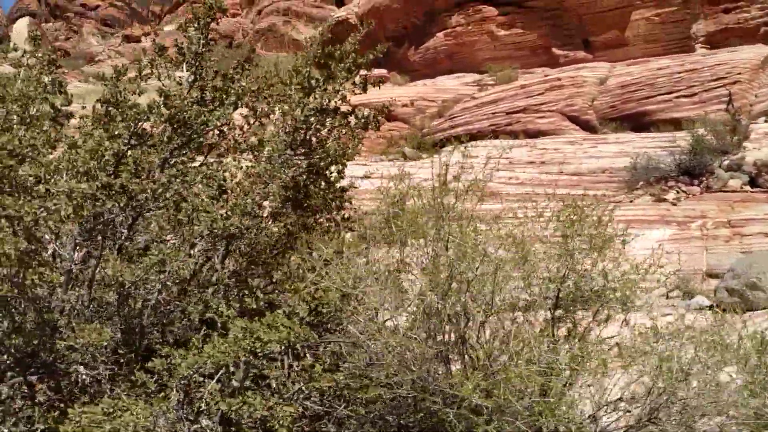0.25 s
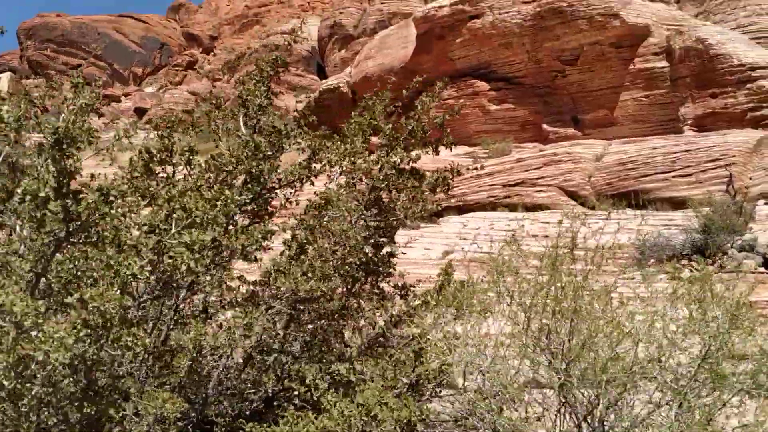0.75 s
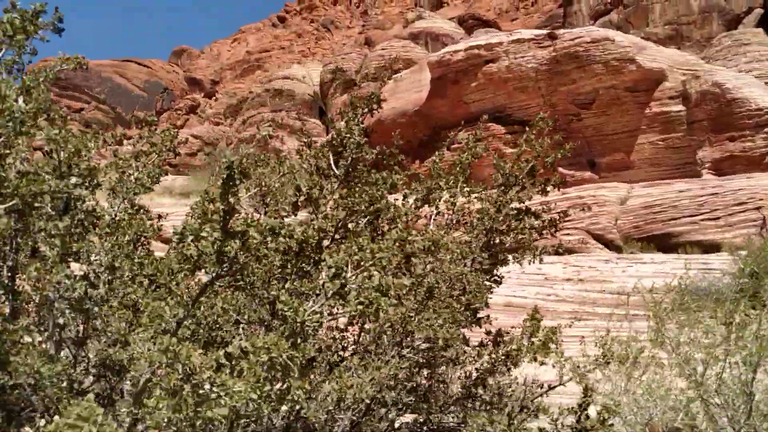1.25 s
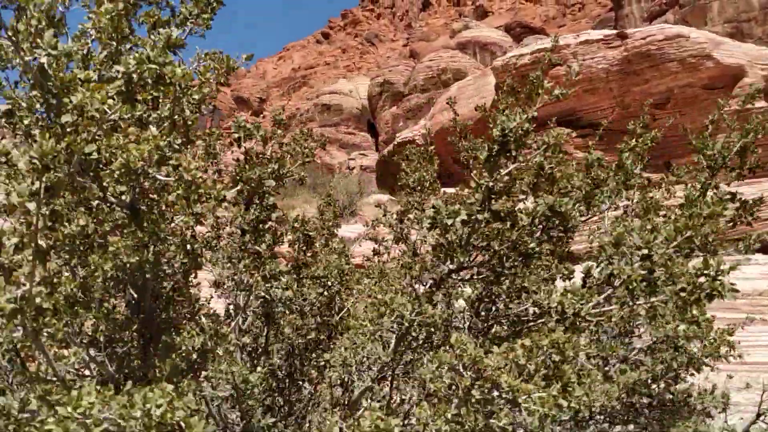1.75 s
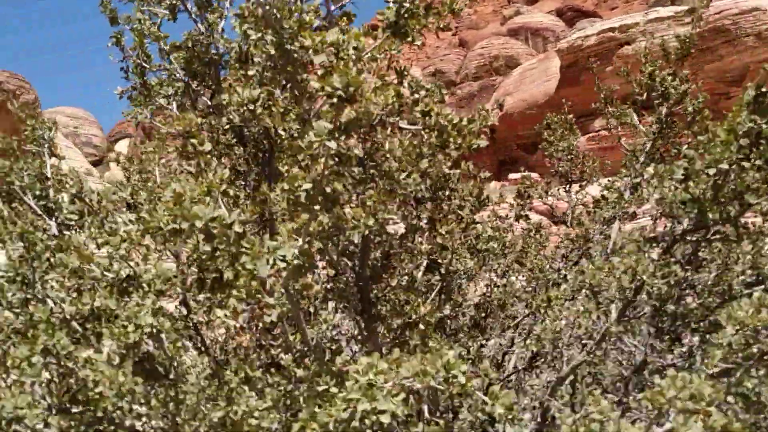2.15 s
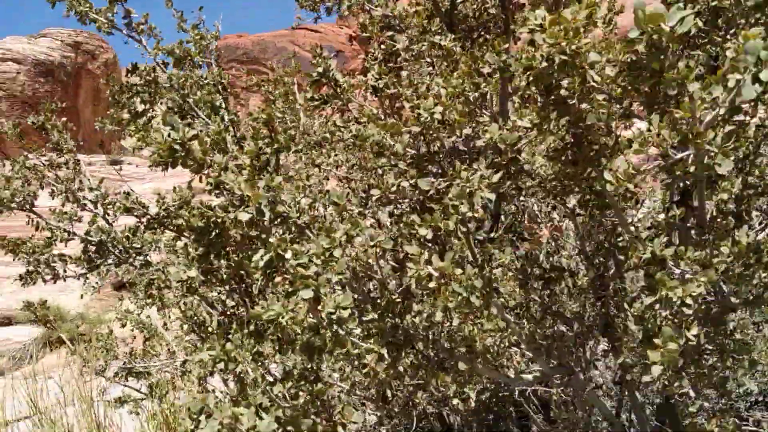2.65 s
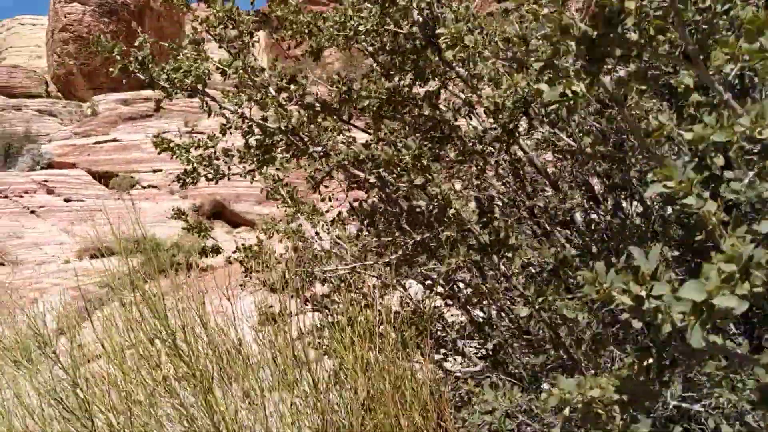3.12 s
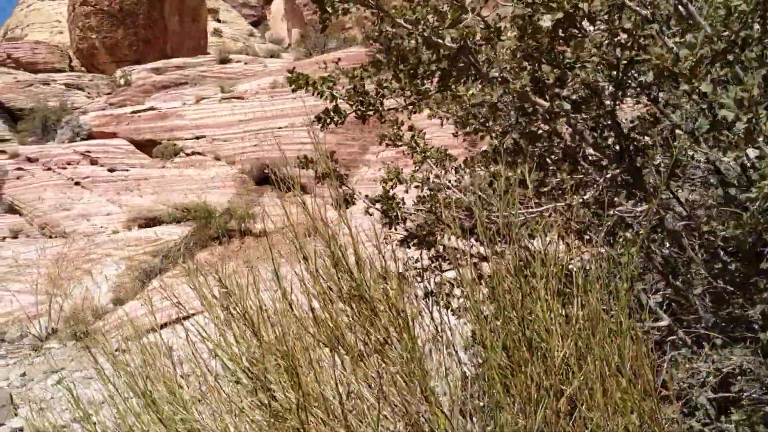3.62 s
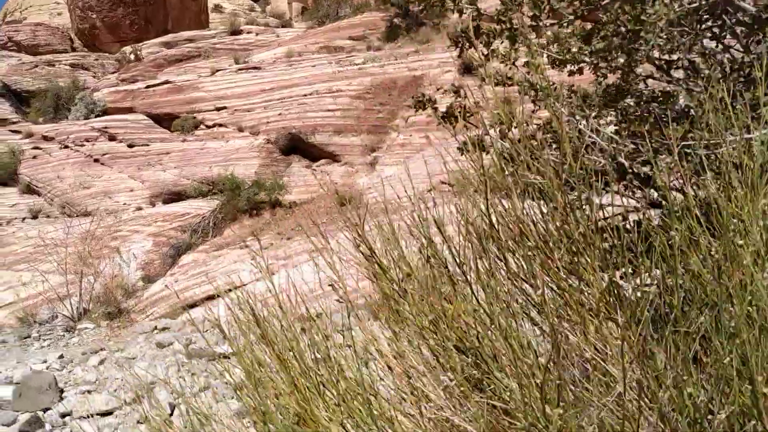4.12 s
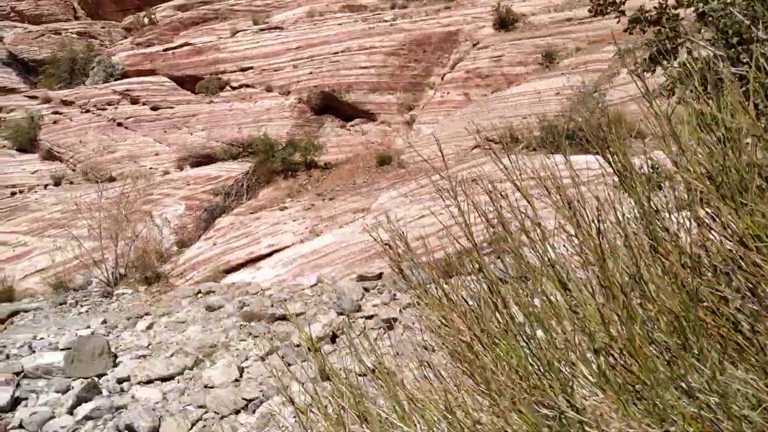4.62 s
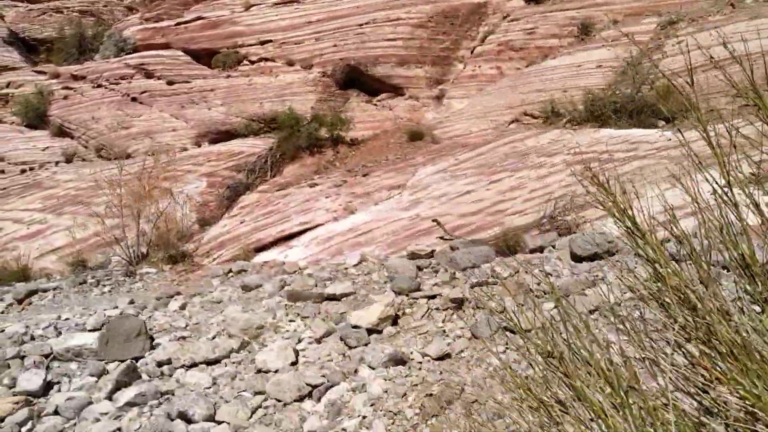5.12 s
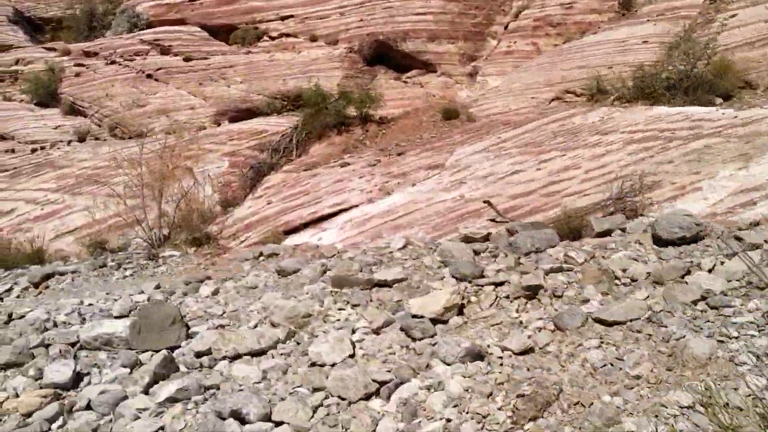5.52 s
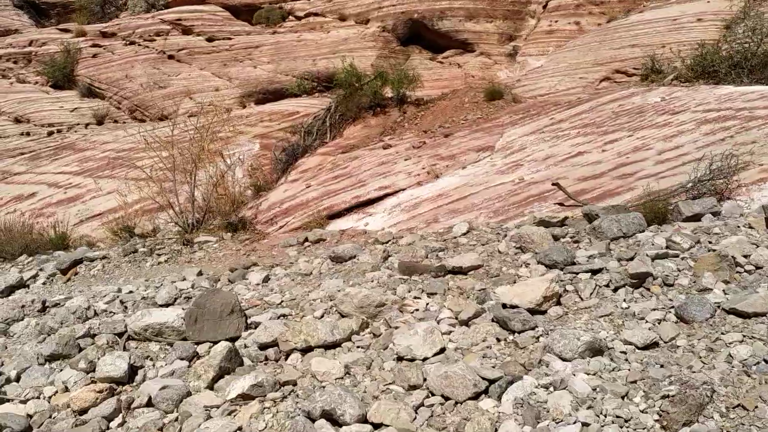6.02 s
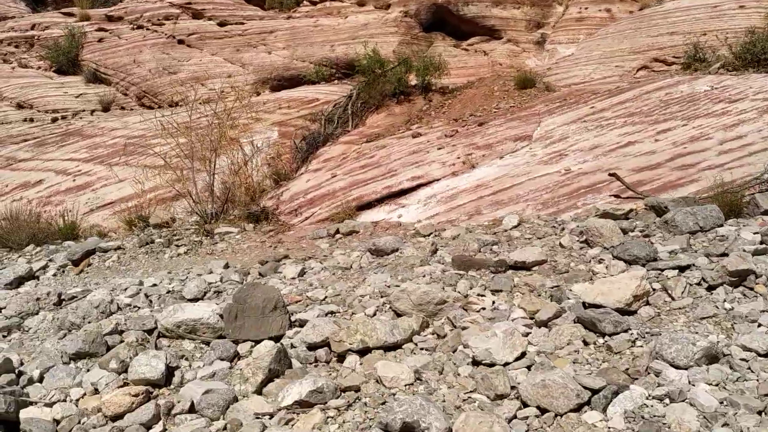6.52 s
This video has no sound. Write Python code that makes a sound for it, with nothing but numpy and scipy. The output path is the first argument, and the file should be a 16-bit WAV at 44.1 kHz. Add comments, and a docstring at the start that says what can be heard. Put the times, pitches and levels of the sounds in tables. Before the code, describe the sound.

Clothes and dry leaves brush softly from 0 to 0.25 s, then a bright, gritty gravel step lands at 0.3 s with snapping pebbles and a dull thud. Lighter treads follow around 0.9 and 1.5 s, the latter with a sharp stone crack. At 1.7 s a small hollow object knocks, a short woody pop with fainter bounces until 1.86. Steps crunch again at 2.1 and 2.6 s; leaves rustle near 3 s before a long grinding step with a heavy thud at 3.3. Scuffs lead to a step at 4.0, cloth swishes at 4.4, a press at 4.6, another swish at 5.0. A strong crunch comes at 5.2, pebbles scatter at 5.4-5.8 around another firm step, leaves stir at 6.0-6.4, and a last thudding step lands at 6.5. Faint open-air hush, close and dry, no echo.

```python
"""Clothes and dry leaves rustle, then slow footsteps grind over dry gravel past desert shrubs.
Random contacts of stones and grit make each step, and low noise makes the thud of the ground.
Short noise bursts make pebbles and twigs snap; fading tones make something hollow knock and bounce.
Cloth and leaves are dense, softer grains. A faint hush of open air lies behind, with no echo."""
import sys
import numpy as np
from scipy import signal
from scipy.fft import rfft, irfft
from scipy.io import wavfile
from scipy.ndimage import uniform_filter1d, map_coordinates

SR = 44100
rng = np.random.default_rng(int(sys.argv[2]) if len(sys.argv) > 2 else 0)


def master(y):
    """Save y as 16-bit WAV."""
    cut = np.clip(np.atleast_2d(y).T, -1, 1)
    pcm = np.round(cut * 32767)  # scale
    wavfile.write(sys.argv[1], SR, pcm.astype(np.int16))


N = 298204
TIME = np.arange(N) / SR  # seconds

# tone colour of stones grinding together: [pitch_hz, level_db (per Hz, relative)]
GRAVEL_COLOUR = [(30, -26.5), (70, -12.5), (120, -5.5), (240, 5), (480, 3), (780, -4), (1300, -3),
                 (1900, -1), (2600, -2.5), (3600, 3), (4700, -0.5), (6400, 3.5), (7600, 10.5),
                 (8400, -11.5)]
COARSE_TOP_HZ = 2500  # large stones crack below this, small ones above


def footfalls():
    """The harder the sole presses, the more stones slip each second; single grains pop throughout."""
    crunch_db, body_db, grit_db = tread_levels()
    # sand keeps trickling even when the foot is lifted
    slips_per_s = 800 + 2600 * undb(0.7 * (crunch_db + 45))
    stones = grains(slips_per_s, spread_db=4.6, crack_s=0.00018, scatter_db=-17.0, ring=0.42)
    stones = colour(stones, GRAVEL_COLOUR)
    stones = patchy(stones, patchy_db=1.5, span_s=0.02, per_octave=4.013)
    body, crack, grit = (steady(band, span_s=0.024) for band in registers(stones))

    # lone grains of sand burst with a tiny bright tick that grows no louder under full weight
    pops = grains(130, spread_db=5.5, crack_s=0.00035, scatter_db=-36.0, ring=0.17)
    pops = sum(registers(colour(pops, SNAP_COLOUR))[1:])
    pops_db = np.minimum(grit_db - 4.5, -63)

    # where there is little fine grit, the stones are coarser and their crack is duller
    coarse_filter = signal.butter(2, COARSE_TOP_HZ, fs=SR, output="sos")
    coarse = signal.sosfiltfilt(coarse_filter, crack)
    fine = crack - coarse
    crack = coarse + fine * undb(0.7 * (grit_db - crunch_db + 4))

    pressed = body * undb(body_db) + crack * undb(crunch_db) + grit * undb(grit_db)
    return pressed + pops / pops.std() * undb(pops_db)


# a sole lands, rolls or scuffs on the gravel:
# [start_s, attack_s, hold_s, release_s, crunch_db (stones), body_db (ground), grit_db (fine grit)]
SOLE_TREADS = [(0.264, 0.025, 0.015, 0.038, -42, -49, -47), (0.879, 0.014, 0.021, 0.031, -48, -49, -51.5),
               (0.967, 0.022, 0.013, 0.011, -52, -52, -54), (1.449, 0.028, .022, 0.01, -44, -50, -45.5),
               (1.507, 0.019, 0.0061, 0.029, -50, -48.5, -54.5),
               (1.873, 0.011, 0.16, 0.066, -72, -69, -75.5),
               (2.066, 0.022, 0.042, 0.054, -46, -45.5, -51.5),
               (2.547, 0.0075, 0.013, .018, -52, -48.5, -58.5), (2.68, 0.031, 0.06, 0.041, -48, -50, -53.5),
               (3.159, 0.055, 0.073, 0.023, -59, -58.5, -63), (3.26, 0.084, 0.072, 0.018, -46, -52, -50.5),
               (3.481, 0.026, 0.0045, 0.059, -56, -62, -57), (3.674, 0.012, 0.029, 0.061, -60, -66.5, -63),
               (3.809, 0.028, .01, 0.014, -65, -67.5, -66), (3.857, 0.021, 0.0053, 0.042, -57, -55.5, -64),
               (3.978, 0.022, 0.034, 0.029, -45.5, -47.5, -57.5),
               (4.074, 0.092, 0.0091, .02, -62.5, -60, -59), (4.273, 0.017, 0.02, 0.027, -66, -66.5, -65),
               (4.544, 0.035, 0.12, 0.021, -50, -51.5, -59.5),
               (4.749, 0.02, 0.014, 0.025, -67.5, -65.5, -68), (5.079, .062, .005, 0.019, -53, -50, -60.5),
               (5.184, 0.044, 0.006, 0.04, -41.5, -44.5, -49.5),
               (5.324, 0.053, 0.15, 0.05, -62.5, -66.5, -67), (5.538, 0.18, 0.049, 0.022, -54, -59.5, -63),
               (5.793, 0.034, 0.066, .016, -43, -47.5, -47), (6.405, 0.009, 0.022, .02, -68.5, -69, -79),
               (6.444, 0.04, 0.014, 0.043, -55.5, -55, -64), (6.567, 0.036, .012, 0.044, -52, -52, -55.5),
               (6.689, 0.0064, 0.0028, 0.031, -59, -58.5, -58)]
# once the weight is off, the crunch dies and a few stones go on settling
SETTLE_S, SETTLE_SHARE = 0.085, 0.18
TRICKLE_DB = -93  # grit that keeps running between the steps


def tread_levels():
    """Crunch, body and grit in dB: each tread presses, lets go and leaves the stones settling."""
    shapes = []
    for start_s, attack_s, hold_s, release_s, *_ in SOLE_TREADS:
        press = envelope(start_s, attack_s, hold_s, release_s)
        settling = envelope(start_s, attack_s, hold_s, SETTLE_S)
        shapes.append((1 - SETTLE_SHARE) * press + SETTLE_SHARE * settling)
    band_db = np.array(SOLE_TREADS)[:, 4:].T
    power = undb(band_db) ** 2 @ np.square(shapes)
    return 10 * np.log10(power + undb(TRICKLE_DB) ** 2)


# the full weight comes down and the ground thuds: [start_s, level_db]
GROUND_THUDS = [(0.3, -67), (0.95, -72.5), (2.06, -71.5), (3.31, -62.5), (4.01, -70), (5.24, -68),
                (5.82, -69.5), (6.5, -61.5)]
THUD_ATTACK_S, THUD_HOLD_S, THUD_RELEASE_S = 0.023, 0.075, 0.063
THUD_LOW_HZ, THUD_HIGH_HZ = 74, 148


def thuds():
    """The packed ground under the gravel takes the weight with a dull rumble."""
    low_band = signal.butter(2, [THUD_LOW_HZ, THUD_HIGH_HZ], "band", fs=SR, output="sos")
    rumble = signal.sosfilt(low_band, rng.standard_normal(N))
    weight = sum(undb(level_db) * envelope(start_s, THUD_ATTACK_S, THUD_HOLD_S, THUD_RELEASE_S)
                 for start_s, level_db in GROUND_THUDS)
    return steady(rumble, span_s=0.051) * weight


# tone colour of a snap, also used for popping sand: [pitch_hz, level_db (per Hz, relative)]
SNAP_COLOUR = [(50, -25.5), (160, -5.5), (380, 2.5), (800, 0.5), (1300, 1), (2000, 1), (2500, -2),
               (3500, 0.5), (4700, -5.5), (6400, 0.5), (7500, 4), (8400, -16)]
# pebbles and twigs that snap; each level is the burst's energy spread over 10 ms:
# [start_s, body_db, crack_db, grit_db, ring_hz, length_s]
PEBBLE_SNAPS = [(0.241, -55, -55.5, -56.5, 4270, 0.0066), (0.2807, -54, -41, -43.5, 3630, 0.026),
                (0.3337, -44.5, -39.5, -45, 3780, 0.0034), (0.442, -66, -60, -79, 3560, 0.0078),
                (0.5006, -63.5, -54.5, -53, 5400, 0.0041), (0.697, -61, -58.5, -77, 880, 0.0036),
                (0.721, -72, -55.5, -81, 3270, 0.0017), (0.792, -62, -60, -71, 3500, 0.007),
                (0.819, -64, -57.5, -60.5, 3597, 0.00098), (0.887, -70, -50.5, -54, 3270, 0.0023),
                (0.901, -45, -80, -43, 566, 0.0045), (0.959, -61, -53.5, -51, 3450, 0.0013),
                (1.4736, -61, -36.5, -44.5, 3520, 0.0012), (1.4847, -58, -41, -48, 4500, 0.0012),
                (1.526, -51, -51, -68, 810, 0.0036), (1.793, -59, -58, -83, 3300, 0.0021),
                (2.018, -60.5, -58, -70, 940, 0.00076), (2.0885, -43.5, -47.5, -37.5, 6444, 0.0043),
                (2.187, -70, -65, -56, 1074, 0.0031), (2.23, -56.5, -58, -70, 860, 0.0041),
                (2.27, -58.5, -51.5, -62.5, 1890, 0.0094), (2.329, -52, -52.5, -53.5, 7450, 0.0067),
                (2.4315, -50.5, -59.5, -71, 700, 0.0026), (2.5488, -48.5, -52.5, -73, 850, 0.0036),
                (2.606, -64, -61, -68, 938, 0.0033), (3.0297, -83, -64.5, -63, 3450, 0.0008),
                (3.172, -64, -65, -77, 2990, 0.0018), (3.214, -61, -50, -52, 7057, 0.00098),
                (3.407, -55, -56, -65, 3618, 0.002), (3.6425, -68, -66, -63, 2506, 0.0021),
                (3.658, -55.5, -58.5, -73, 772, 0.0023), (3.687, -76, -68, -66, 3540, 0.00088),
                (3.7746, -80, -79, -56.5, 6680, 0.00086), (3.937, -50.5, -53.5, -64, 684, 0.0074),
                (3.9537, -74, -54, -46, 7040, 0.0012), (3.96, -69, -69, -49.5, 5550, 0.001),
                (3.9792, -51.5, -48.5, -62, 1780, 0.0015), (4.1116, -63, -61, -61, 3688, 0.0016),
                (4.4536, -63, -63, -74, 3460, 0.0017), (4.524, -64, -56, -83, 779, 0.0027),
                (4.9943, -62, -59.5, -68, 3066, 0.0054), (5.044, -71, -61, -76, 1080, 0.0053),
                (5.3608, -53, -50.5, -59, 3618, 0.0025), (5.392, -55.5, -56.5, -57, 5840, 0.00072),
                (5.4764, -55, -48.5, -66, 2104, 0.00072), (5.525, -59.5, -58, -82, 1283, 0.0052),
                (5.56, -57, -54.5, -60, 1847, 0.007), (5.578, -62.5, -56.5, -64, 3790, 0.0017),
                (5.6295, -71, -56, -83, 1680, 0.0014), (5.708, -72, -49.5, -53, 2360, 0.0014),
                (5.7254, -65, -61, -54, 6623, 0.0026), (5.757, -66, -46.5, -57.5, 2905, 0.0011),
                (5.7908, -51.5, -48, -54.5, 2700, 0.0037), (5.8049, -45, -41.5, -47.5, 1660, 0.0063),
                (6.0145, -53.5, -53.5, -61, 807, 0.0087), (6.4942, -45.5, -45.5, -48.5, 1305, 0.0055),
                (6.5354, -56.5, -54, -78, 389.6, 0.0032), (6.5804, -51, -54, -69, 873, 0.0026)]


def snaps(size=2048):
    """A pebble shoots from under the shoe or a twig gives: a sharp crack, a brief ring and a spray of grit."""
    out = np.zeros(N + 2 * size)
    t = np.arange(size) / SR
    for start_s, *band_db, ring_hz, length_s in PEBBLE_SNAPS:
        onset = np.minimum(t / 0.0003, 1)
        spray = undb(-17) * np.exp(-t / 0.005)
        shape = onset * (np.exp(-(t / length_s) ** 2) + spray)
        # silence in front leaves room for the filters that smear both ways in time
        burst = np.pad(rng.choice([-1, 1], size) * shape, (size, 0))
        burst = colour(burst, SNAP_COLOUR)
        burst = burst + 1.73 * signal.lfilter(*signal.iirpeak(ring_hz, 4.0, fs=SR), burst)
        # a stone radiates little below its ring: the body comes from the ground under it
        high_pass = signal.butter(3, 0.56 * ring_hz, "high", fs=SR, output="sos")
        stone = signal.sosfilt(high_pass, burst)
        bands = registers(burst)[:1] + registers(stone)[1:]
        start = int(start_s * SR)
        for band, level_db in zip(bands, band_db):
            power = np.sum(band ** 2) / (0.01 * SR)
            out[start:start + 2 * size] += band * undb(level_db) / np.sqrt(power)
    return out[size:size + N]


# tone colour of cloth, leaves and stems: [pitch_hz, level_db (per Hz, relative)]
RUSTLE_COLOUR = [(40, -26.5), (150, -25), (250, -8.5), (370, 3.5), (550, -4.5), (850, -4), (1150, -9),
                 (1900, -8), (2500, -13), (3500, -5.5), (4400, -18.5), (7600, -24)]
TWIG_TICK_DB = -8.5  # ticks of dry stems, relative to the leaves


def rustle():
    """Cloth rubs with the stride, its folds shifting in pitch, while dry leaves brush and stems tick."""
    cloth_db, leaves_db = swish_levels()
    rubbing = grains(5000, spread_db=6.0, crack_s=0.0017, scatter_db=-7.0, ring=0.2)
    cloth, leaves, tips = registers(colour(rubbing, RUSTLE_COLOUR))
    cloth = patchy(cloth, patchy_db=5.0, span_s=0.045, per_octave=3.9, size=512)
    leaves = patchy(leaves + tips, patchy_db=3.5, span_s=0.04, per_octave=3.5)
    ticks = grains(40, spread_db=1.0, crack_s=0.00096, scatter_db=-27, ring=0.51, count=12)
    ticks = colour(ticks, RUSTLE_COLOUR)
    shrub = steady(leaves, span_s=0.042) + undb(TWIG_TICK_DB) * ticks / ticks.std()
    return steady(cloth, span_s=0.014) * undb(cloth_db) + shrub / shrub.std() * undb(leaves_db)


# clothes and leaves brush as a leg swings: [start_s, attack_s, hold_s, cloth_db, leaves_db]
LEG_SWISHES = [(0.021, 0.051, 0.0049, -64.5, -63.5), (0.134, 0.079, 0.012, -61.5, -60.5),
               (0.487, 0.026, 0.035, -74, -67), (0.631, 0.0092, 0.21, -72, -66),
               (1.074, 0.018, 0.015, -69.5, -71), (1.245, 0.046, 0.13, -70.5, -70.5),
               (1.825, 0.048, 0.023, -66, -65), (2.316, 0.05, 0.11, -68, -70),
               (2.89, 0.042, 0.031, -98, -67), (3.042, 0.025, 0.036, -83, -65),
               (4.286, 0.18, 0.099, -63.5, -65.5), (4.831, 0.06, 0.053, -65.5, -69.5),
               (4.984, 0.059, 0.022, -61.5, -61.5), (5.985, 0.018, 0.071, -78, -64.5),
               (6.199, 0.023, 0.045, -98, -65.5), (6.256, 0.023, 0.13, -73, -72.5)]
SWISH_RELEASE_S = 0.038
# the faint stir that is left between swings
CLOTH_REST_DB, LEAVES_REST_DB = -92, -81


def swish_levels():
    """Cloth and leaves in dB: each swing of a leg lifts them above their resting stir."""
    shapes = [envelope(start_s, attack_s, hold_s, SWISH_RELEASE_S)
              for start_s, attack_s, hold_s, *_ in LEG_SWISHES]
    layer_db = np.array(LEG_SWISHES)[:, 3:].T
    power = undb(layer_db) ** 2 @ np.square(shapes)
    rest_power = undb([[CLOTH_REST_DB], [LEAVES_REST_DB]]) ** 2
    return 10 * np.log10(power + rest_power)


# hollow knocks: [start_s, ring_peak_db, pitch (multiple of the tones below), tick_peak_db]
HOLLOW_KNOCKS = [(1.7023, -46.5, 1.5, -47.5), (1.7297, -25.5, 1.0, -76), (1.7737, -44.5, 1.5, -48.5),
                 (1.856, -50, 1.45, -53)]
# tones of the hollow thing at pitch 1: [pitch_hz, level_db (relative), time_to_fall_60_db_s]
HOLLOW_TONES = [(585, 0, 0.045), (835, -1, 0.038), (1270, -16, .01)]


def knocks(size=4096):
    """A blow on a small hollow body: a dry tick of contact, then a short ring that drops early."""
    out = np.zeros(N + size)
    t = np.arange(size) / SR
    for start_s, peak_db, pitch, tick_db in HOLLOW_KNOCKS:
        ring = np.zeros(size)
        for hz, level_db, t60_s in HOLLOW_TONES:
            fade = undb(-60 * t * pitch / t60_s)
            ring += undb(level_db) * np.sin(2 * np.pi * hz * pitch * t) * fade
        # the ring swells in quickly, then drops to 0.4
        ring *= np.interp(t * pitch, [0, 0.001, 0.006, 0.0075], [0, 1, 1, 0.4])
        # a small body radiates no bass, and its ring no treble
        ring_band = signal.butter(3, [380 * pitch, 1120 * pitch], "band", fs=SR, output="sos")
        ring = signal.sosfilt(ring_band, ring)
        tick = rng.standard_normal(size) * np.exp(-t / 0.0024) * np.minimum(t / 0.0006, 1)
        tick = registers(tick)[1]
        start = int(start_s * SR)
        out[start:start + size] += undb(peak_db) * ring / np.abs(ring).max()
        out[start:start + size] += undb(tick_db) * tick / np.abs(tick).max()
    return out[:N]


# tone colour of the open air: [pitch_hz, level_db (per Hz, relative)]
AIR_COLOUR = [(20, 0.5), (800, -14.5), (3500, -12), (6000, -26)]
AIR_DB = -85


def air():
    """The faint hush of open air: steady noise that is weaker in the treble."""
    hush = sum(registers(colour(rng.standard_normal(N), AIR_COLOUR)))
    return undb(AIR_DB) * hush / hush.std()


def grains(per_s, spread_db, crack_s, scatter_db, ring, count=24):
    """Random contacts of `count` kinds and many sizes: most are tiny, a few are large."""
    out = np.zeros(N)
    for _ in range(count):
        hits = np.flatnonzero(rng.random(N) < per_s / count / SR)
        sizes = undb(spread_db * np.minimum(rng.exponential(size=len(hits)), 4))
        pulses = np.zeros(N)
        pulses[hits] = rng.choice([-1, 1], len(hits)) * sizes
        out += signal.oaconvolve(pulses, contact(crack_s, scatter_db, ring))[:N]
    return out


def contact(crack_s, scatter_db, ring, size=1024):
    """One stone meeting another: a crack, the brief ring of the stone, a scatter of sand."""
    t = np.arange(size) / SR
    hz = np.exp(rng.uniform(np.log(600), np.log(7800)))
    fade = np.exp(-t / crack_s) + undb(scatter_db) * np.exp(-t / 0.011)
    crack = rng.standard_normal(size) * fade
    # every stone colours its crack around its own pitch
    crack = crack / 2 + signal.lfilter(*signal.iirpeak(hz, 2, fs=SR), crack)
    return crack + ring * np.sin(2 * np.pi * hz * t) * np.exp(-t * hz / 2.63)


def envelope(start_s, attack_s, hold_s, release_s):
    """Pressure builds, a little slowly at first, then holds and dies away."""
    out = np.zeros(N)
    end_s = start_s + attack_s + hold_s + 10 * release_s
    span = slice(int(start_s * SR), int(end_s * SR))
    t = TIME[span] - start_s
    build = np.clip(t / attack_s, 0, 1) ** 1.1  # a power above 1 slows the start
    out[span] = build * np.exp(-np.maximum(t - attack_s - hold_s, 0) / release_s)
    return out


def patchy(x, patchy_db, span_s, per_octave, size=256):
    """Let resonances come and go: neighbouring pitches swell and fade together."""
    hz, s, frames = signal.stft(x, SR, nperseg=size, noverlap=3 * size // 4)
    # read a smooth random map: pitch along one side, time along the other
    place = np.meshgrid(per_octave * np.log2(1 + hz / 300), s / span_s, indexing="ij")
    field = map_coordinates(rng.standard_normal((40, 1000)), place, order=3, mode="wrap")
    frames = frames * undb(patchy_db * field)
    return signal.istft(frames, SR, nperseg=size, noverlap=3 * size // 4)[1][:len(x)]


def steady(x, span_s):
    """Bring the running rms close to 1 and keep the faster grain."""
    span = int(span_s * SR)
    power = uniform_filter1d(uniform_filter1d(x ** 2, span), span)
    return x / np.sqrt(np.maximum(power, np.mean(power) / 10 ** 4))  # never lift near-silence fully


BODY_TOP_HZ, CRACK_TOP_HZ, TOP_HZ = 1000, 4300, 8450


def registers(x):
    """Split a sound by pitch into its body (low), its crack (middle) and its grit (high)."""
    below = [signal.sosfiltfilt(signal.butter(4, hz, fs=SR, output="sos"), x)
             for hz in (BODY_TOP_HZ, CRACK_TOP_HZ, TOP_HZ)]
    return below[0], below[1] - below[0], below[2] - below[1]


def colour(x, spectrum, size=2048):
    """Filter a sound to a (pitch_hz, level_db) curve, with no sound ahead of its cause."""
    hz, db = np.transpose(spectrum)
    bins = np.maximum(np.arange(size // 2 + 1) * SR / size, 1)
    cepstrum = irfft(np.log(undb(np.interp(np.log(bins), np.log(hz), db))))
    # folding the cepstrum forward gives a minimum-phase filter
    cepstrum[1:size // 2] *= 2
    cepstrum[size // 2 + 1:] = 0
    response = irfft(np.exp(rfft(cepstrum)))
    return signal.fftconvolve(x, response)[:len(x)]


def undb(db):
    """Decibels to gain."""
    return 10 ** (np.asarray(db) / 20)


def scene():
    """All sounds add up and are alike in both ears."""
    mono = footfalls() + thuds() + snaps() + rustle() + knocks() + air()
    return np.tile(mono, (2, 1))


def record(dry):
    """The camera cuts the treble steeply above TOP_HZ."""
    return signal.sosfilt(signal.ellip(10, 0.2, 70, TOP_HZ, fs=SR, output="sos"), dry)


dry = scene()
out = record(dry)
master(out)
```